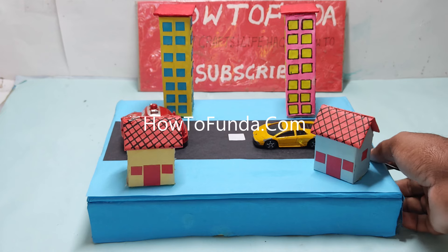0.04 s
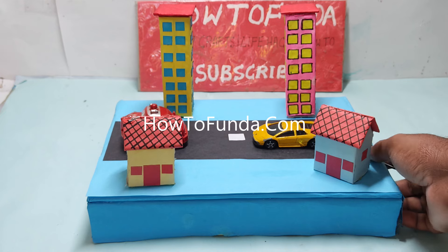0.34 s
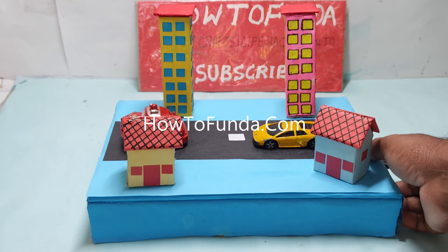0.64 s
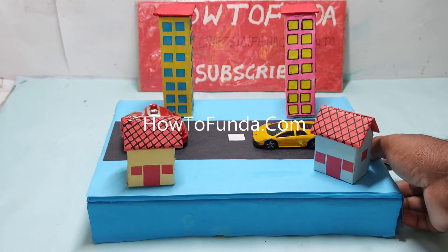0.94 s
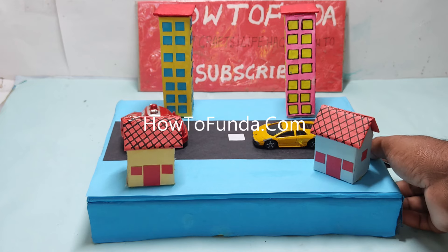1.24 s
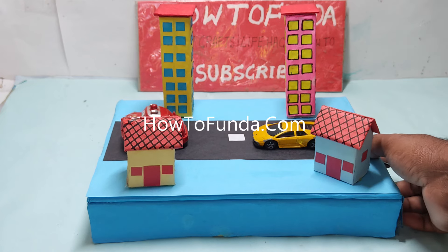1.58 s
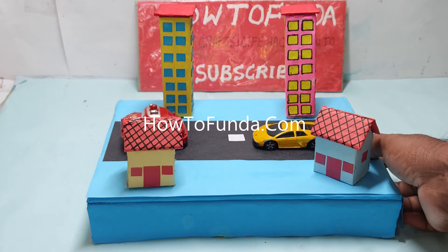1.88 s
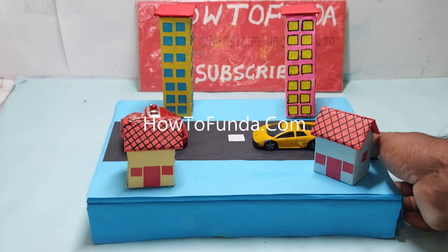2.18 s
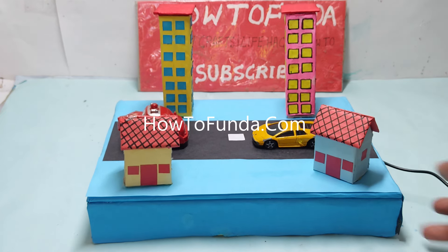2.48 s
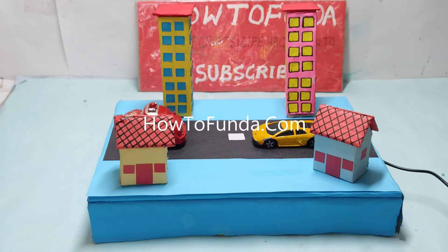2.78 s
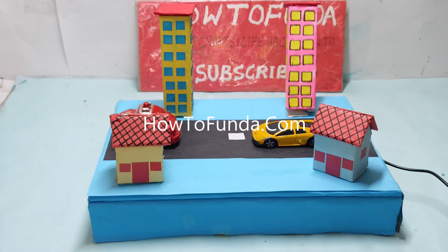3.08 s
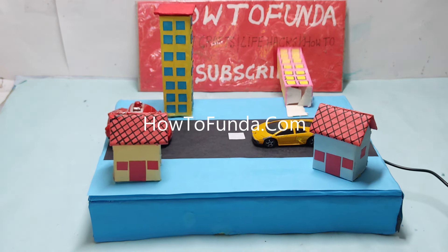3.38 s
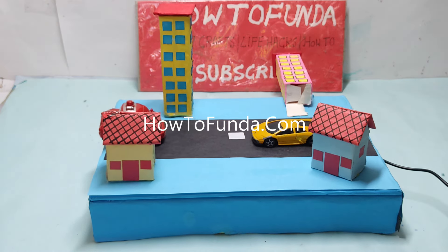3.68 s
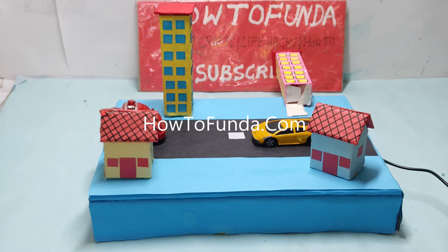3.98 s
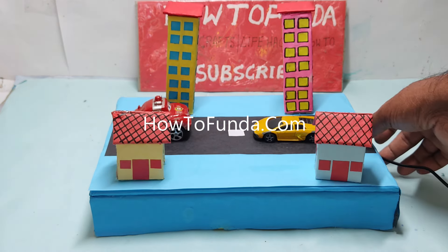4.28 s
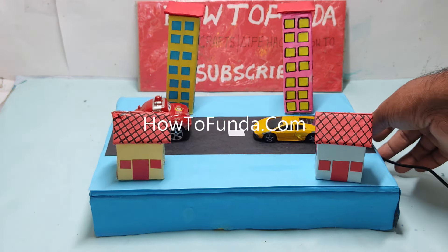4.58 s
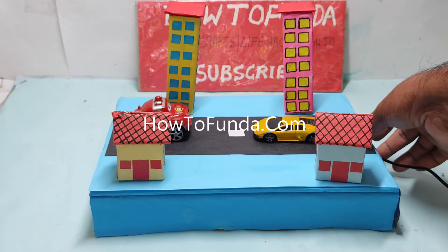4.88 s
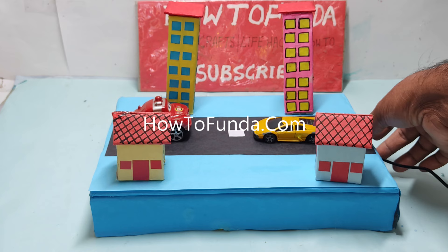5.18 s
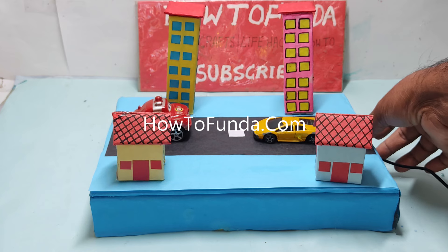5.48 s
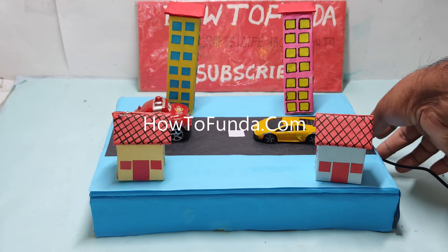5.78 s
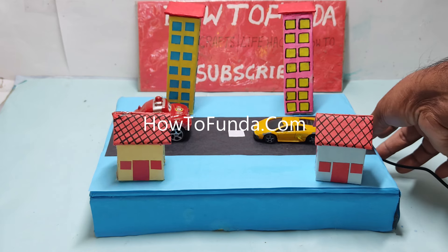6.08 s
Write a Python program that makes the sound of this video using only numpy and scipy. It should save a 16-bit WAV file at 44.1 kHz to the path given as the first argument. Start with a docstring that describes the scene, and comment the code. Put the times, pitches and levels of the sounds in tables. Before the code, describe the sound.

A small electric motor clicks on and drones steadily in a cardboard box, shaking loose parts, then stops suddenly, leaving room hiss.

```python
"""Motor in a cardboard model

Fingers feel for a switch, it clicks twice and a small DC motor spins up to about 76 turns a second.
Its off-centre weight knocks the box once a turn: panels drone, loose parts rasp, the model rocks.
The buzz breaks off abruptly, leaving louder room hiss, faint chirps and a hand rubbing the cardboard."""
import sys
import numpy as np
from scipy import signal
from scipy.fft import rfft, irfft, next_fast_len
from scipy.io import wavfile

SR = 44100
rng = np.random.default_rng(int(sys.argv[2]) if len(sys.argv) > 2 else 0)


def transcribe(u):
    """Save the signal u as a 16-bit wav file named by the first command-line argument.

    u: samples, shape (n,) or (channels, n), limited to [-1, 1]; the rate is SR.
    q: integer samples, one column per channel.
    """
    v = np.clip(np.atleast_2d(u).T, -1, 1)
    q = np.round(v * 32767).astype(np.int16)
    wavfile.write(sys.argv[1], SR, q)


N = 275184
TIME = np.arange(N) / SR

# Spectra of the hiss before and after the buzz breaks off, and of the building's rumble. Each row: frequency in
# Hz, relative density in dB.
QUIET_AIR = [(40, -25), (130, -22), (326, -22.5), (480, -26), (927, -31.5), (1460, -36.5), (2430, -38),
             (5140, -43), (6600, -40.5), (8000, -34.5), (9200, -42), (10500, -56), (15000, -70)]
LOUD_AIR = [(40, -8), (120, -13.5), (240, -5.5), (354, -10.5), (462, -9), (600, -10.5), (1000, -14),
            (2000, -17), (3500, -22), (6500, -23), (7900, -14.5), (8800, -17.5), (9500, -24.5),
            (10500, -41), (12500, -45), (14000, -64)]
RUMBLE_SPECTRUM = [(2, -10), (8, 0), (17, 0), (28, -8), (42, -10), (65, -18), (130, -32), (500, -70)]
# Fingers feeling for the switch. Each row: start in seconds, bump level in dB, scratch level in dB.
TOUCHES = [(0.508, -59.5, -63.5), (.556, -74, -67), (0.8795, -50, -55), (1.104, -64, -56.5),
           (1.315, -71, -67), (1.654, -80, -67), (1.857, -65, -67)]
# Spectra of a fingertip's bump and scratch and of the lever's tick. Each row: frequency in Hz, gain in dB.
BUMP_SPECTRUM = [(100, -23), (220, -8), (320, -4.5), (550, -5), (720, -23), (1100, -25), (3000, -42)]
SCRATCH_SPECTRUM = [(300, -20), (1000, -11), (2400, -12), (3500, -16), (6500, -15), (7400, 3), (8100, 0),
                    (8900, -2), (10000, -13), (11000, -27), (13000, -31), (15500, -50)]
TICK_SPECTRUM = [(250, -26), (900, -4), (1600, -7), (1900, 4), (2250, -5), (2800, -4), (3500, -15),
                 (5100, -11), (6300, -14), (7500, 4), (8800, -1), (10000, -15), (11000, -23), (15500, -27)]
# Switch clicks. Each row: start in seconds, tick level in dB, knock level in dB,
# contact time in seconds, rebound delay in seconds.
CLICKS = [(2.1178, -20.5, -18, 0.000056, 0.0089), (2.293, -17.5, -12.7, 0.000014, 0.00804)]
# Modes of the box, of the model's loose houses and of the weight's first tap.
# Each row: frequency in Hz, level in dB, T60 in seconds.
BOX_MODES = [(337, -10, 0.13), (387, -22, 0.12), (440, -19, 0.1), (527, 2, 0.098), (635, 7, 0.024),
             (748, -7, 0.039), (797, -17, 0.25), (973, -13, 0.057), (1250, -24, 0.037)]
HOUSE_MODES = [(192, -17, .07), (341, -13, 0.21), (436, 0, 0.15), (533, 1, 0.18), (660, 2, 0.047),
               (1075, 3.5, 0.12), (1110, -1, 0.094), (1196, -12, 0.054)]
GRAZE_MODES = [(980, -5, 0.037), (1193, 1.5, 0.05)]
# Running speed, sagging under load. Each row: time in seconds, turn rate in Hz.
SPEED = [(2.56, 77.16), (2.862, 76.53), (3.748, 76.3), (3.772, 76.45), (4.16, 76.7)]
# Box drone at full speed. Each row: multiple of the turn rate, relative level in dB,
# left minus right in dB from reflections.
DRONE_PARTIALS = [(1.003, -13, 0.5), (2.025, -20, 0.5), (2.978, -19.5, 0.5), (4, -12.5, 2.5), (5, 0, -0.5),
                  (6, -2.5, -1), (7, 3.5, -1.5), (8, -6, -4), (9, -15, -4.5), (10, -18.5, 2), (11, -18, 14),
                  (12, -19.5, 24), (13, 1.5, 1), (14, -7, -3.5), (15, -9.5, 11.5), (16, -2.5, -1),
                  (17, -16, 4), (18, -27, -5), (19, -14.5, 5), (20, -19.5, -1), (21, -31.5, -12),
                  (22, -27.5, 2), (23, -19, 14), (24, -21, 8), (25, -24, -1), (26, -26, -11), (27, -18, 4),
                  (28, -29.5, -6), (29, -37.5, 5), (30, -33, 2), (31, -16, 5), (32, -28, -1)]
# Resonances of the loose panel. Each row: frequency in Hz, width in Hz.
PANEL_MODES = [(211, 18.6), (452, 17.5)]
# Contacts of loose parts within a turn. Each row: position in turns, level in dB, decay in turns.
CONTACTS = [(.89, 0, .085), (.99, -3.5, .17), (.62, -9, .13), (.33, -12.5, .13)]
# Spectra of the brushes' scrape and the loose parts' chatter. Each row: frequency in Hz, gain in dB.
BRUSH_SPECTRUM = [(800, -13), (1400, 1), (2300, 3), (2850, 0.5), (3250, -10.5), (3550, -0.5), (4200, -10.5),
                  (5000, -2), (5600, -9.5), (6200, -13.5), (6950, -7), (7300, -1.5), (8000, -6),
                  (8400, -1.5), (8900, 9), (9300, -3), (9700, -15), (12200, -27), (15500, -36)]
CHATTER_SPECTRUM = [(800, -20), (1350, -9), (1750, -3), (2750, -1), (3400, -7), (4200, -9), (4800, -5),
                    (5500, -7), (6100, -17), (7000, -14), (7300, 1), (8000, 3), (8400, -1), (9000, 3),
                    (9700, -17), (12000, -22), (15500, -40)]
# Falling chirps. Each row: start in seconds, length in seconds, first and last pitch in Hz, level in dB.
CHIRPS = [(5.198, .072, 6500, 5400, -70), (5.506, .055, 6700, 5000, -73), (5.75, .025, 5270, 3680, -68)]
# Hand strokes on the cardboard. Each row: start in seconds, length in seconds, level in dB.
RUBS = [(5.355, 0.057, -61.5), (5.71, 0.17, -63.5), (5.935, 0.15, -65), (6.064, 0.19, -60)]
# Spectrum of the rubbing. Each row: frequency in Hz, gain in dB.
RUB_SPECTRUM = [(130, -27), (210, -10), (248, -1), (285, -11), (380, -12), (455, 4), (550, -11), (680, -10),
                (900, -16), (3000, -43)]
# Mismatch of the two microphone ports. Each row: frequency in Hz, left minus right in dB.
PORT_BALANCE = [(60, 5), (330, 4.5), (520, 4.7), (1000, 2.5), (2000, 0), (3500, -1), (4200, -1),
                (5000, -4.5), (6800, -3), (7300, -3), (7700, -8), (8100, -5), (8500, 1), (9000, 6),
                (9350, 11), (9700, 5), (10200, 0), (15000, 1)]

START_S, KNOCK_S, STOP_S = 2.293, 2.398, 4.186
FULL_HZ, SPIN_UP_S = 76.5, .046
STUMBLE_END_S, STUMBLE_TURNS = 2.54, .024
SHAKE_DB, FREE_SPIN_DB, FIRST_KNOCK_DB, KNOCK_GROW_S = -29, -23, -9, .065
BRUSH_DB, RASP_DB, FIRST_RASP_DB, RASP_GROW_S = -54, -36.5, -2, .29
# A resonance of the model briefly holds the motor back and shakes the box harder.
CATCH_S, CATCH_WIDTH_S, CATCH_SAG_HZ, CATCH_SHAKE_DB, CATCH_RATTLE_DB = 2.485, .04, 1.7, 1, 7
# The model settles: the panel stops ringing, rocking and rattle grow. Each pair: from, to.
SETTLE_S, PANEL_DB, ROCK_DEPTH, RATTLE_DB = (2.67, 3.67), (11.5, -5.5), (.04, .19), (-17, -13.5)


def undb(db):
    """Decibels to gain."""
    return 10 ** (np.asarray(db) / 20)


def unit(x):
    """Scale to rms 1."""
    return x / np.sqrt(np.mean(x ** 2))


def ramp(start_s, length_s):
    """Linear rise from 0 to 1, then held."""
    return np.clip((TIME - start_s) / length_s, 0, 1)


def drift(rate_hz):
    """Smooth random drift, spread near 1."""
    knots = rng.standard_normal(int(N / SR * rate_hz) + 2)
    return np.interp(TIME * rate_hz, np.arange(len(knots)), knots)


def highpass(x, order, hz):
    """Butterworth bass cut."""
    return signal.sosfilt(signal.butter(order, hz, "high", fs=SR, output="sos"), x)


def minimum_phase(db):
    """Phase in radians of a causal body with this gain on an even frequency grid."""
    log_gain = np.log(undb(db))
    return -signal.hilbert(np.r_[log_gain, log_gain[-2:0:-1]]).imag[:len(db)]


def colour(x, spectrum, share=1):
    """Causal filter through (Hz, dB) points; share scales the dB."""
    size = 2 * next_fast_len(N // 2 + SR // 10)
    point_hz, point_db = np.transpose(spectrum)
    hz = np.maximum(np.fft.rfftfreq(size, 1 / SR), 1)
    db = share * np.interp(np.log(hz), np.log(point_hz), point_db)
    return irfft(rfft(x, size) * undb(db) * np.exp(1j * minimum_phase(db)), size)[..., :N]


def convolve(x, response):
    """Apply an impulse response."""
    return signal.fftconvolve(np.atleast_2d(x), np.atleast_2d(response), axes=-1)[:, :N]


def stereo_noise(alike_hz, apart_hz=30):
    """White noise, alike in both channels between apart_hz and alike_hz."""
    mid, side = rfft(rng.standard_normal((2, N)))
    hz = np.fft.rfftfreq(N, 1 / SR)
    alike = hz / (hz + apart_hz) / (1 + (hz / alike_hz) ** 2)
    side = side * np.sqrt(1 - alike) * np.array([[1], [-1]])
    return unit(irfft(mid * np.sqrt(1 + alike) + side, N))


def ring(modes, age_s):
    """Decaying modes of a struck body."""
    return sum(undb(db - 60 * age_s / t60_s) * np.sin(2 * np.pi * hz * age_s) for hz, db, t60_s in modes)


def room(x, wet_db, t60_s):
    """Add a small room's diffuse tail."""
    t = TIME[:SR // 2]
    onset = np.clip(t / .011, 0, 1) ** 2
    tail = stereo_noise(910)[:, :len(t)] * undb(-60 * t / t60_s) * onset
    return x + undb(wet_db) * convolve(x, tail / np.sqrt(np.sum(tail ** 2) / 2))


def hiss(spectrum):
    """Room air and microphone hiss, unit level above 100 Hz."""
    air = colour(stereo_noise(790, apart_hz=84.6), spectrum) * undb(.5 * drift(12))
    return air / highpass(air.mean(axis=0), order=4, hz=100).std()


def rumble(level_db=-63.3, hum_db=-79, hum_hz=100):
    """Deep building rumble and a trace of mains hum."""
    building = unit(colour(stereo_noise(890, apart_hz=25), RUMBLE_SPECTRUM))
    hum = np.sqrt(2) * np.sin(2 * np.pi * hum_hz * TIME)
    return undb(level_db) * building + undb(hum_db) * hum


def slips(count=7, level_db=-69, scatter_db=1.5):
    """Faint random finger slips before the first click, in rows like TOUCHES."""
    starts_s = (np.arange(count) + rng.random(count)) / count * CLICKS[0][0]
    db = level_db + scatter_db * rng.standard_normal(count)
    return list(zip(starts_s, db, db))


def fingers(press_s=.0025, decay_s=.022):
    """Skin presses and slips on cardboard: a dull bump with a thin scratch."""
    bumps, scratches = np.zeros(N), np.zeros(N)
    for start_s, bump_db, scratch_db in list(TOUCHES) + slips():
        age_s = np.maximum(TIME - start_s, 0)
        press = (1 - np.exp(-age_s / press_s)) * np.exp(-age_s / decay_s)
        bumps += undb(bump_db) * press
        scratches += undb(scratch_db) * press
    bump = bumps * unit(colour(stereo_noise(2500), BUMP_SPECTRUM))
    scratch = scratches * unit(colour(stereo_noise(1800), SCRATCH_SPECTRUM))
    return room(bump + scratch, wet_db=-13, t60_s=.2)


def clicks(snap_s=.0029, tick_decay_s=.0028):
    """The plastic lever ticks, snaps home against the box and rebounds once, more softly."""
    rebound_knock_db, rebound_tick_db, rebound_contact_s = -5, -14, .00016
    ticks, pushes = np.zeros(N), np.zeros(N)
    t = TIME[:SR // 50]
    for start_s, tick_db, knock_db, contact_s, rebound_s in CLICKS:
        home_s = start_s + snap_s
        back_s = home_s + rebound_s
        for at_s, db in (start_s, tick_db), (back_s, tick_db + rebound_tick_db):
            ticks += undb(db) * (TIME >= at_s) * np.exp(-np.abs(TIME - at_s) / tick_decay_s)
        knocks = (home_s, knock_db, contact_s), (back_s, knock_db + rebound_knock_db, rebound_contact_s)
        for at_s, db, width_s in knocks:
            push = t * np.exp(-t / width_s)
            first = int(at_s * SR)
            pushes[first:first + len(push)] += undb(db) * push / push.sum()
    box = highpass(ring(BOX_MODES, TIME[:SR // 4]), order=4, hz=340)  # a small box radiates little bass
    thud = room(convolve(pushes, box / np.abs(box).max()), wet_db=-9, t60_s=.24)
    tick = colour(ticks * stereo_noise(2500), TICK_SPECTRUM)
    return thud + room(tick, wet_db=-3.5, t60_s=.18)


def motor():
    """The motor spins up, stumbles and knocks harder; the knocks drive drone, rattle and rasp."""
    speed = 1 - np.exp(-np.maximum(TIME - START_S, 0) / SPIN_UP_S)
    caught = np.exp(-((TIME - CATCH_S) / CATCH_WIDTH_S) ** 2)
    turn_hz = np.interp(TIME, *np.transpose(SPEED)) * speed - CATCH_SAG_HZ * caught
    turns = np.cumsum(turn_hz * (1 + .0018 * drift(60))) / SR
    turns += STUMBLE_TURNS * speed * np.sqrt(1 - ramp(KNOCK_S, STUMBLE_END_S - KNOCK_S)) * drift(70)
    knock = (TIME >= KNOCK_S) * undb(FIRST_KNOCK_DB * (1 - ramp(KNOCK_S, KNOCK_GROW_S)))
    rattle_db = np.interp(TIME, SETTLE_S, RATTLE_DB) + CATCH_RATTLE_DB * caught
    body = drone(turn_hz, turns) + undb(rattle_db) * rattle(turns)
    shaking = undb(SHAKE_DB + CATCH_SHAKE_DB * caught) * np.maximum(knock, undb(FREE_SPIN_DB) * speed ** 2)
    rasp_db = RASP_DB + FIRST_RASP_DB * (1 - ramp(KNOCK_S, RASP_GROW_S))
    scraping = np.hypot(undb(rasp_db) * knock, undb(BRUSH_DB) * speed)
    running = 1 - ramp(STOP_S - .001, .001)
    return running * (shaking * body + scraping * rasp(turns))


def drone(turn_hz, turns, rock_hz=17.7, waver_db=1.3, reflection_rad=.3, scatter_order=17):
    """The box weights and delays each multiple of the turn rate; rocking adds sidebands."""
    orders, full_db, pans_db = np.transpose(DRONE_PARTIALS)
    lags_rad = minimum_phase(np.r_[full_db[0], full_db])[1:]
    panel_gain = undb(np.interp(TIME, SETTLE_S, PANEL_DB))
    rock_depth = np.interp(TIME, SETTLE_S, ROCK_DEPTH)
    rock_rad = 2 * np.pi * np.cumsum(rock_hz * (1 + .1 * drift(9))) / SR
    sides = np.array([[.5], [-.5]])
    out = 0
    for order, lag_rad, pan_db in zip(orders, lags_rad, pans_db):
        hz = order * turn_hz
        edge = min(order / 12, 1)  # high orders come from the knock's sharp edge, which varies most
        db = np.interp(hz / FULL_HZ, orders, full_db) + edge * waver_db * drift(11)
        resonance = sum(1 / (1 + 2j * (hz - mode_hz) / width_hz) for mode_hz, width_hz in PANEL_MODES)
        panel = 1 + (panel_gain - 1) * resonance
        tilt_rad, bump_rad, detour_rad = rng.uniform(0, 2 * np.pi, 3)
        rock = np.sin(rock_rad + tilt_rad) + 2 * np.sin(2 * rock_rad + bump_rad)  # two touchdowns a rock
        gain = undb(db + sides * pan_db) * np.abs(panel) * (1 + rock_depth * edge ** 2 * rock)
        phase = 2 * np.pi * order * turns + lag_rad + np.angle(panel)
        if order > scatter_order:  # these arrive by many paths, so they whirr rather than tick
            phase += detour_rad / 2
        spread_rad = sides * reflection_rad * min(order / 5, 1)  # reflections delay the left
        out += gain * np.sin(phase - spread_rad)
    return out / np.sqrt(np.sum(undb(full_db) ** 2) / 2)


def rattle(turns, alternation=.57):
    """The loose houses hop unevenly once a turn and ring between the drone's lines."""
    count = np.floor(turns)
    scatter = 2 * rng.random(N) - 1
    odd_even = alternation * (1 - 2 * (count % 2)) * np.tanh(drift(18))
    hops = np.diff(count, prepend=0) * (scatter + odd_even)
    walls = highpass(ring(HOUSE_MODES, TIME[:SR // 4]), order=6, hz=185)
    return unit(room(convolve(hops, walls), wet_db=-7, t60_s=.24))


def grit(turns, repeat_share=.42):
    """Friction noise, part of which repeats with the shaft angle."""
    angle_index = (turns % 1 * SR / FULL_HZ).astype(int)
    repeating = stereo_noise(3200)[:, angle_index]
    return np.sqrt(repeat_share) * repeating + np.sqrt(1 - repeat_share) * stereo_noise(3200)


def rasp(turns, chatter_db=2.5, scatter_db=1.6, wander_db=1.3, slop_turns=.011):
    """Loose parts chatter at about the same points of each turn, over the brushes' steady scrape."""
    power = 0
    for place_turns, db, decay_turns in CONTACTS:
        count, age_turns = np.divmod(turns - place_turns + 1 + slop_turns * drift(76), 1)
        hit_db = db + scatter_db * rng.standard_normal(N)[count.astype(int)]
        power += (undb(hit_db) * np.exp(-age_turns / decay_turns)) ** 2
    force = np.sqrt(power) * undb(wander_db * drift(9.8))
    scrape = unit(colour(grit(turns), BRUSH_SPECTRUM))
    chatter = unit(colour(grit(turns) * force, CHATTER_SPECTRUM))
    return unit(scrape + undb(chatter_db) * chatter)


def graze(start_s=2.376, level_db=-40):
    """A light tap as the weight first brushes the model."""
    return undb(level_db) * ring(GRAZE_MODES, np.maximum(TIME - start_s, 0))


def chirps():
    """Thin falling whistles, like a small distant bird."""
    out = np.zeros(N)
    for start_s, length_s, first_hz, last_hz, db in CHIRPS:
        progress = ramp(start_s, length_s)
        hz = first_hz + (last_hz - first_hz) * progress
        out += undb(db) * np.sin(np.pi * progress) * np.sin(2 * np.pi * np.cumsum(hz) / SR)
    return room(out, wet_db=3, t60_s=.3)


def rubbing(uneven_db=3):
    """The hand shifts its grip on the cardboard in soft, uneven strokes."""
    pressure = sum(undb(db) * np.sin(np.pi * ramp(start_s, length_s)) for start_s, length_s, db in RUBS)
    return pressure * undb(uneven_db * drift(35)) * unit(colour(stereo_noise(1500), RUB_SPECTRUM))


def scene(left_lag_s=.00003, quiet_db=-70, loud_db=-61, swell_db=2):
    """The model, slightly nearer the right port, over hiss that steps up as the buzz breaks off."""
    left, right = fingers() + clicks() + graze() + motor() + rubbing()
    model = np.array([np.interp(TIME - left_lag_s, TIME, left), right])
    later_db = loud_db + swell_db * ramp(start_s=5.27, length_s=.53)
    air = np.where(TIME < STOP_S, undb(quiet_db) * hiss(QUIET_AIR), undb(later_db) * hiss(LOUD_AIR))
    return model + chirps() + air + rumble()


def record(dry):
    """Each microphone port adds its own colour; the top is cut."""
    top_hz = 15750
    left = colour(dry[0], PORT_BALANCE, share=.5)
    right = colour(dry[1], PORT_BALANCE, share=-.5)
    return signal.sosfilt(signal.ellip(8, .2, 70, top_hz, fs=SR, output="sos"), np.array([left, right]))


dry = scene()
out = record(dry)
transcribe(out)
```